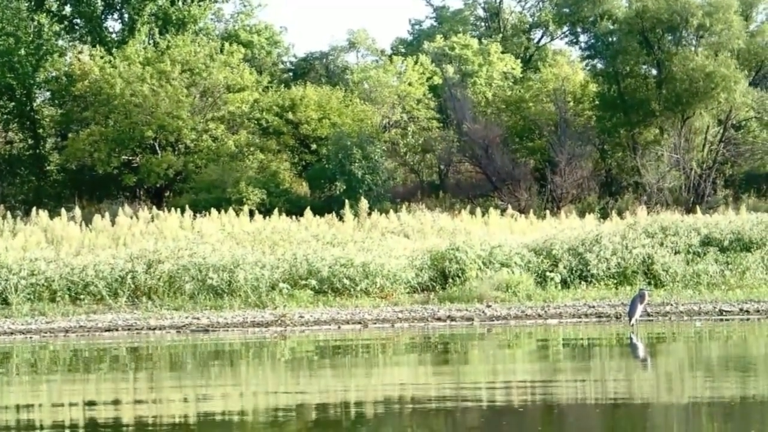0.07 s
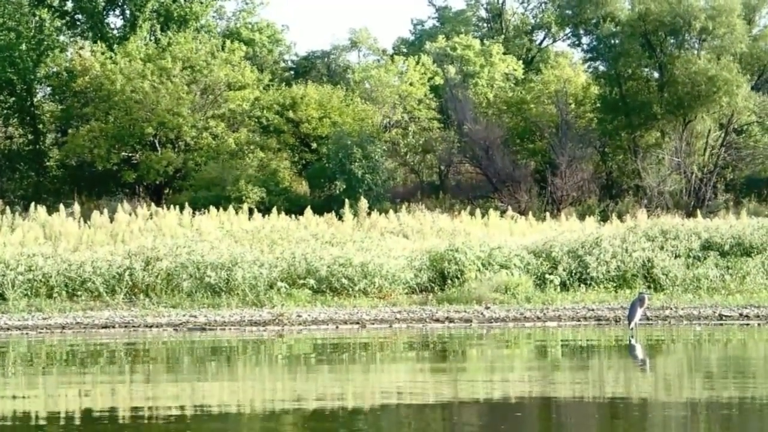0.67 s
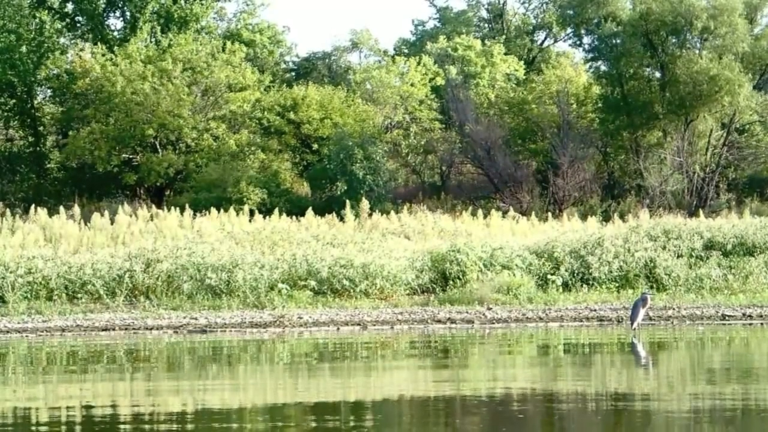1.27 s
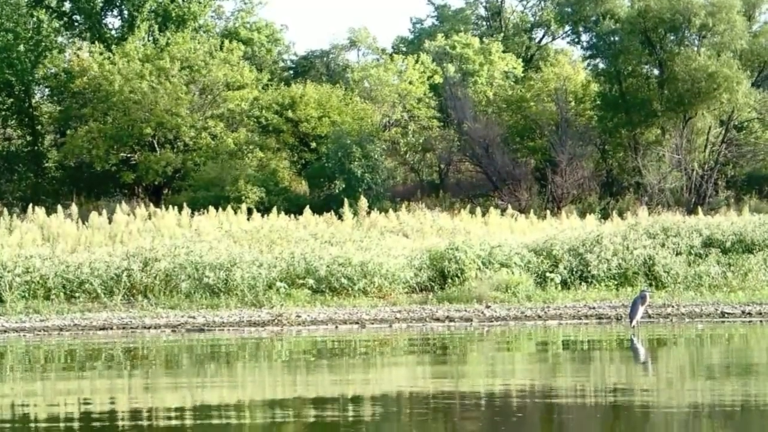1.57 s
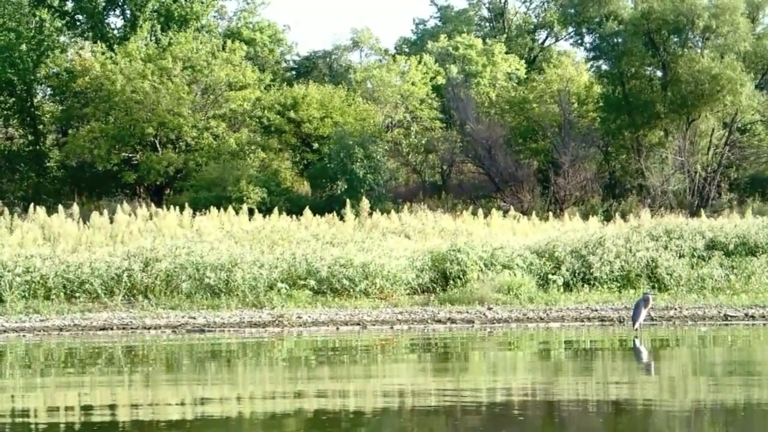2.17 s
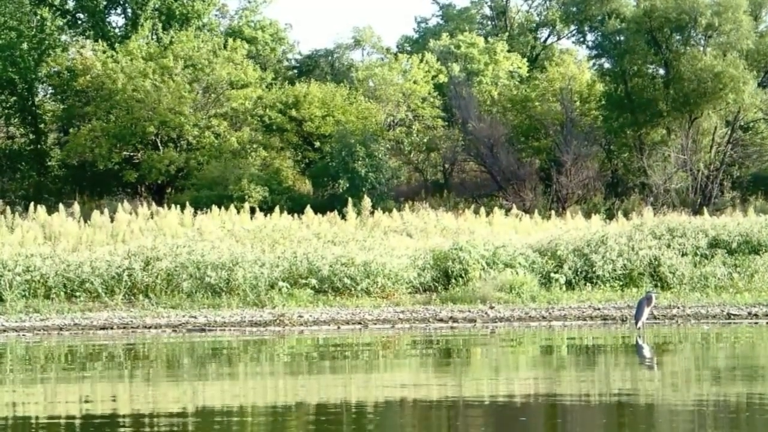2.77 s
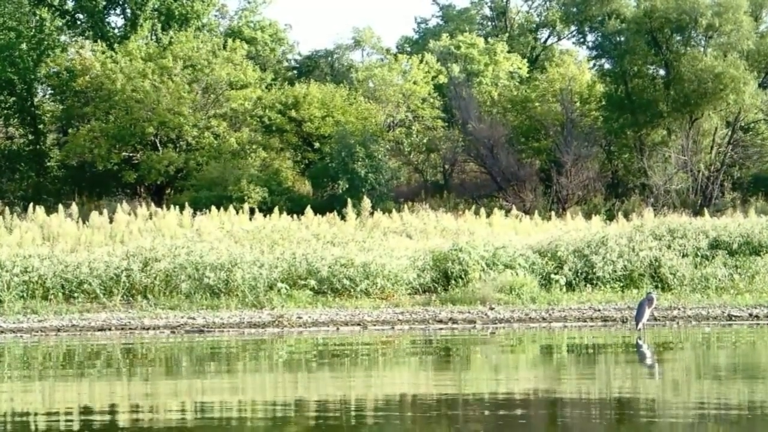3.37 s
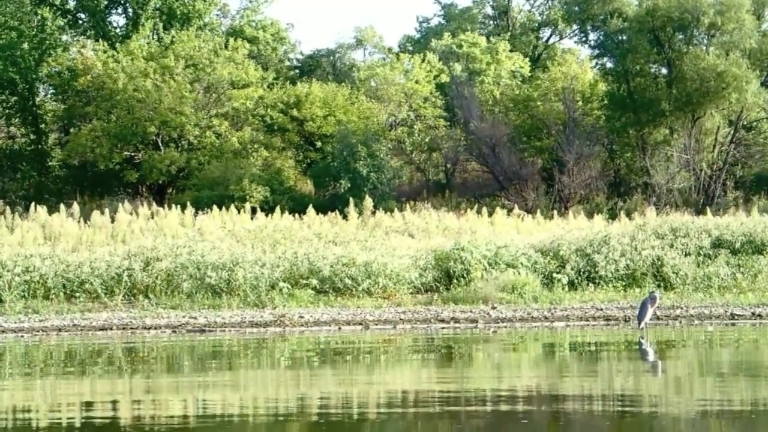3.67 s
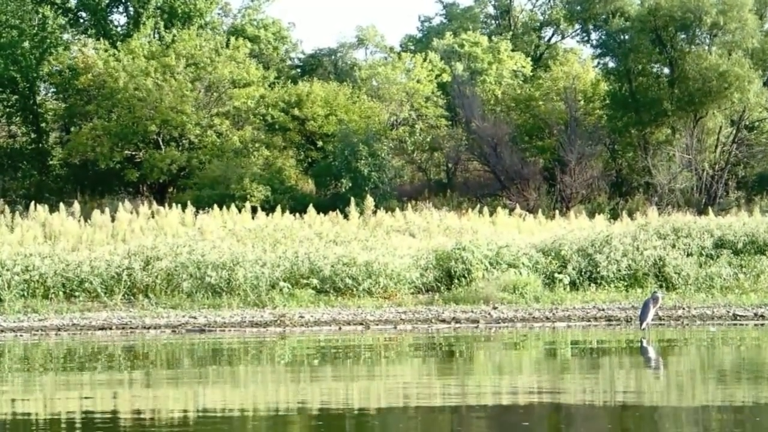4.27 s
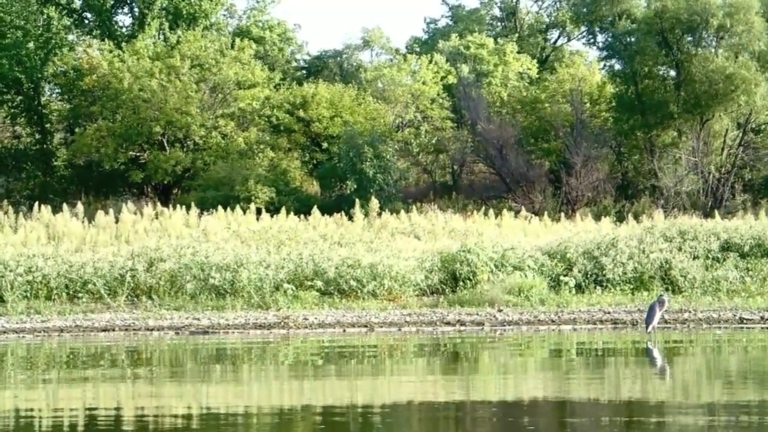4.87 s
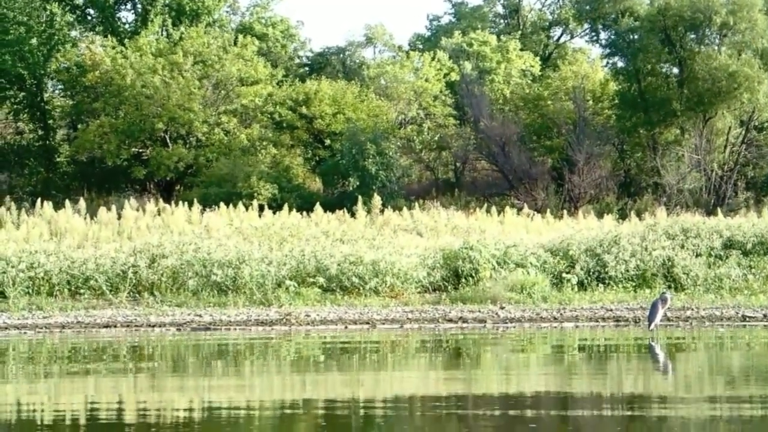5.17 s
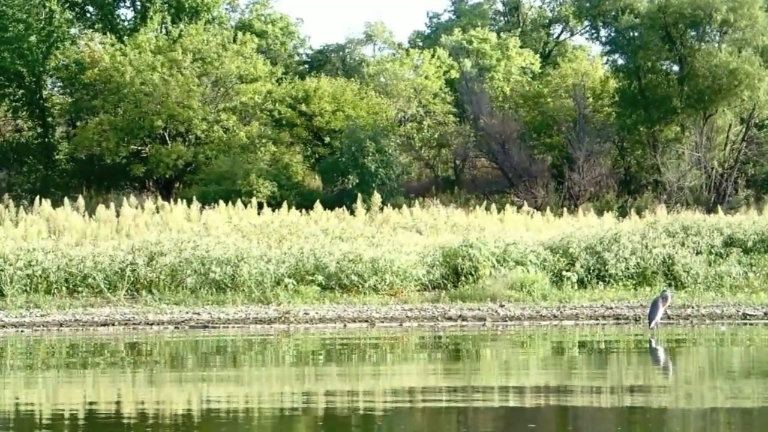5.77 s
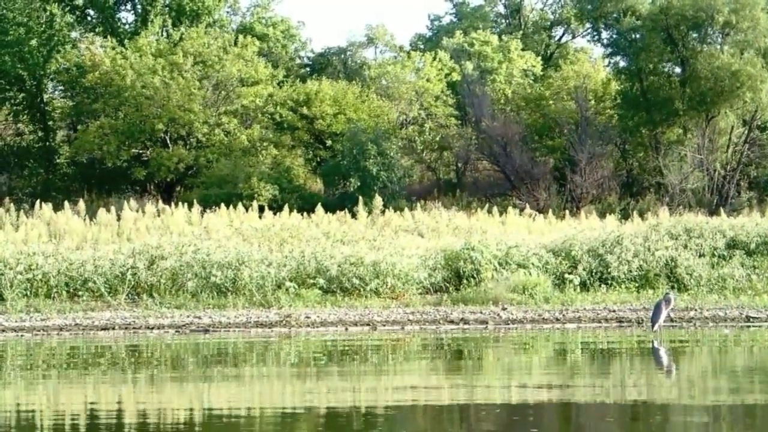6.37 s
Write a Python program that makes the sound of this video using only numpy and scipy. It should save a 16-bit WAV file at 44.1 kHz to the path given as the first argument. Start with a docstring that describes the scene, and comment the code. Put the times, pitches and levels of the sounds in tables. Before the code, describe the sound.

Two small birds trade thin, high whistles and peeps over a steady drone of crickets and katydids on a quiet lake shore.

```python
"""A still, wooded lake shore in late summer. Crickets and katydids drone in the weeds over a soft hush,
a distant hum and faint twittering. Just before 1 s a small bird on the right starts thin, falling
whistles; a second overlaps it with peeps and swoops, and the tree line gives a faint echo. After 3 s the
first drops out and a far bird peeps. Around 5 s the cricket chorus crests and one nearer cricket chirps
with its wings; the second bird sings on to the end."""
import sys
import numpy as np
from scipy import signal
from scipy.fft import rfft, irfft, next_fast_len
from scipy.io import wavfile
from scipy.ndimage import uniform_filter1d

SR = 44100
rng = np.random.default_rng(int(sys.argv[2]) if len(sys.argv) > 2 else 0)


def persist_wave(psi):
    """Save psi, clipped to +-1, as 16-bit WAV."""
    counts = np.round(np.clip(psi, -1, 1) * 32767).astype(np.int16)
    wavfile.write(sys.argv[1], SR, np.atleast_2d(counts).T)


N = 291937
TIME = np.arange(N) / SR
FIRST_BIRD_RIGHT_DB, SECOND_BIRD_RIGHT_DB, WEEDS_RIGHT_DB = 11, 8, 6.5  # pan: right level over left

# tone of the hush: (frequency [Hz], relative density [dB])
HUSH_SPECTRUM = [(25, -34), (45, -21), (70, -11.5), (110, -2.5), (200, 0.5), (320, -1.5), (700, -1.5),
                 (1600, -6.5), (2800, -7.5), (6300, -10), (10000, -10.5), (15500, -10)]
# stereo image of the hush: (frequency [Hz], left-right likeness [0-1])
HUSH_LIKENESS = [(120, 0.67), (330, 0.11), (2000, 0.01), (8000, 0.3)]
# partials of the distant hum: (pitch [Hz], start level [dB], end level [dB])
HUM_PARTIALS = [(86.2, -83.5, -68), (171.7, -65.5, -72.5)]
# swells of the katydids, about 1.2 s apart: (crest time [s], rise [dB])
KATYDID_CRESTS = [(1.62, 3.5), (2.85, 4), (4.1, 4.5), (5.35, 3), (6.35, 5.5)]
# fader curve of the cricket chorus: (time [s], level [dB])
CHORUS_FADER = [(0, -60), (1.5, -55.5), (3.4, -54), (5, -51), (6.62, -55.5)]
# pitches the crickets gather around: (centre [Hz], width [Hz], relative level [dB])
CHORUS_BANDS = [(4278, 236, -1.5), (4553, 250, -1.5), (5110, 410, -6.5)]
# the near cricket's runs of wing strokes: (start [s], end [s])
WING_RUNS = [(4.483, 4.782), (4.914, 5.047), (5.082, 5.114), (5.149, 5.282), (5.315, 5.348), (5.381, 5.414)]
# the far bird's peeps: (centre time [s], length [s], pitch [Hz], level [dB])
FAR_BIRD_PEEPS = [(3.48, 0.038, 3360, -58), (3.545, 0.064, 3362, -56.5), (3.62, 0.032, 3430, -54),
                  (3.866, .028, 3700, -55), (3.942, .03, 3290, -59), (4.065, 0.072, 3160, -59),
                  (4.16, 0.035, 3357, -55.5), (4.283, 0.041, 3670, -50.5), (4.333, .022, 3720, -58),
                  (4.386, 0.029, 3726, -53), (4.467, 0.045, 3438, -55.5), (4.82, 0.086, 3600, -52.5),
                  (4.873, 0.041, 3377, -52.5), (4.993, .035, 3640, -51), (5.265, 0.073, 3270, -56),
                  (6.305, .025, 3643, -60), (6.38, .025, 3834, -57), (6.6, .035, 3820, -56)]
# dry ticks and lisps: (centre time [s], length [s], pitch [Hz], level [dB])
TICKS_AND_LISPS = [(1.505, .018, 5650, -47), (4.398, .0011, 4350, -26), (4.61, .014, 5750, -49),
                   (5.452, .0005, 3300, -32)]
# arched peeps, some trailing off in a soft sagging note (None if not):
# (centre time [s], length [s], pitch [Hz], level [dB], sag pitch [Hz], sag level [dB])
NEAR_PEEPS = [(1.071, .037, 4520, -34, 3863, -57), (1.541, .031, 4390, -31, 3880, -58),
              (1.922, .035, 4550, -44.5, 3920, -53), (2.507, .035, 4198, -46, None, None),
              (2.559, .03, 4398, -34, None, None), (2.608, .03, 4333, -33.5, None, None),
              (3.112, .04, 4444, -37.5, None, None), (3.215, 0.027, 4196, -56, 3853, -51.5),
              (3.671, .031, 4190, -45.5, None, None), (3.712, .036, 4423, -47, 3895, -52),
              (3.742, 0.032, 4573, -44.5, None, None), (4.067, .04, 4553, -42, 3900, -50.5),
              (4.445, .035, 4474, -42.5, 3926, -53), (4.619, .038, 4318, -40.5, None, None),
              (4.712, .052, 4540, -39, None, None), (5.34, .042, 4427, -43.5, 3960, -50),
              (5.52, .022, 4200, -51, None, None), (5.614, .05, 4690, -42.5, None, None),
              (5.888, .03, 4582, -39.8, 3916, -57.5), (6.487, .055, 4560, -43.5, None, None)]
# the second bird's swooping whistles: (leap time [s], climb length [s], arch length [s], top pitch [Hz],
# climb level [dB], climb swell [dB], top level [dB], arch fade [dB])
SECOND_BIRD_SWOOPS = [(1.465, 0.12, 0.11, 4747, -41.5, 13, -39, 13),
                      (2.107, .16, .115, 4745, -37.5, 7, -37, 10),
                      (2.705, .02, 0.15, 4600, -63, 5, -37.5, 19),
                      (3.253, 0.12, 0.11, 4635, -47, -3, -41.5, 9),
                      (3.887, 0.12, .138, 4740, -45.5, 8, -49, -8),
                      (4.865, .12, 0.1, 4666, -40.5, 25, -36, 14),
                      (5.752, 0.12, .09, 4640, -51, 9, -41.5, 9.5),
                      (6.67, .15, .1, 4660, -47.5, 18, -40, 12)]
# the first bird's downward slurs: (start [s], length [s], opening pitch [Hz], level [dB])
FIRST_BIRD_SLURS = [(1.974, .045, 4345, -41), (2.426, 0.04, 4200, -42.5), (3.198, 0.062, 4100, -49)]
# the first bird's falling whistles: (turn time [s], hold length [s], fall length [s], opening pitch [Hz],
# turn pitch [Hz], waver depth [Hz], level [dB], swell while held [dB])
FIRST_BIRD_FALLS = [(.824, 0.093, 0.12, 4250, 4166, 50, -47, -3.5),
                    (1.307, 0.1, 0.12, 4370, 4440, 45.3, -33.5, 2.5),
                    (1.763, .1, 0.12, 4390, 4540, 25.08, -30.5, 1.5),
                    (2.202, .092, .124, 4320, 4540, 55, -28, 8),
                    (2.69, 0.073, 0.094, 4300, 3980, 110, -43, 2)]


def from_db(db):
    return 10 ** (np.asarray(db) / 20)


def unit_rms(x):
    return x / np.sqrt(np.mean(x ** 2) + 1e-20)


def automation(rows):
    """One per-sample curve for each column after the time column."""
    times, *columns = np.transpose(rows)
    return [np.interp(TIME, np.sort(times), column) for column in columns]


def at_hz(points, hz):
    frequencies, values = np.transpose(points)
    return np.interp(np.log(hz), np.log(frequencies), values)


def drift(rate_hz):
    """Smooth random modulation with an rms of 1."""
    hop, run_in = 40, 2000
    pole = np.exp(-2 * np.pi * hop * rate_hz / SR)
    noise = rng.standard_normal(N // hop + run_in + 2)
    slow = signal.lfilter([1], [1, -2 * pole, pole * pole], noise)[run_in:]
    return np.interp(np.arange(N) / hop, np.arange(len(slow)), unit_rms(slow))


def phase_of(hz):
    return 2 * np.pi * np.cumsum(hz) / SR


def bandpass(x, low, high, order=2):
    return signal.sosfilt(signal.butter(order, [low, min(high, .45 * SR)], "band", fs=SR, output="sos"), x)


def noise_band(low, high, likeness, order=2):
    """A band of stereo noise with a given left-right likeness and an rms of 1."""
    mid, side = bandpass(rng.standard_normal((2, N)), low, high, order)
    return unit_rms(np.sqrt(1 + likeness) * mid + np.sqrt(1 - likeness) * side * [[1], [-1]])


def pan(x, right_db, lag_s=0):
    """Place a sound by level difference and by how late it reaches the right side."""
    gains = from_db([[-right_db / 2], [right_db / 2]])
    size = next_fast_len(N)
    hz = np.arange(size // 2 + 1) * SR / size
    delay = np.exp(-2j * np.pi * hz * np.array([[0], [lag_s]]))
    return irfft(rfft(x, size) * delay, size)[:, :N] * gains / gains.mean()


def scatter(x, delay_s, decay_s):
    """Countless leaves and stems throw back a diffuse tail, different on each side."""
    t = np.arange(int((delay_s + decay_s) * SR)) / SR
    tail = rng.standard_normal((2, len(t))) * from_db(-60 * t / decay_s) * (t > delay_s)
    tail /= np.sqrt(np.sum(tail ** 2, axis=1, keepdims=True))
    return signal.fftconvolve(x[None], tail, axes=1)[:, :N]


def hush(level_db=-51.5, wander_db=.5):
    """A soft bed of outdoor air in half-octave bands, each breathing on its own."""
    edges = 20 * 2 ** np.arange(0, 10, .5)
    air = 0
    for low, high in zip(edges, edges[1:]):
        hz = np.sqrt(low * high)
        gain = np.sqrt(high - low) * from_db(at_hz(HUSH_SPECTRUM, hz) + wander_db * drift(6.1))
        air += gain * noise_band(low, high, at_hz(HUSH_LIKENESS, hz), order=3)
    return from_db(level_db) * unit_rms(air)


def distant_hum():
    """Two low, wavering partials: the lower fades up as the upper recedes."""
    hum = 0
    for hz, start_db, end_db in HUM_PARTIALS:
        phase = phase_of(hz * (1 + .0153 * drift(4.56)))
        hum += from_db(np.linspace(start_db, end_db, N) + 2 * drift(2.9)) * np.sin(phase)
    return hum


def katydids(floor_db=-57, swell_half_width_s=.4, fast_stroke_hz=49, slow_stroke_hz=19):
    """A high rasp that comes in swells, pulsed by wing strokes at two rates."""
    swells_db = sum(db * np.exp(-((TIME - s) / swell_half_width_s) ** 2) for s, db in KATYDID_CRESTS)
    wide_rasp = noise_band(11050, 12750, likeness=.5, order=1)
    rasp = unit_rms(bandpass(wide_rasp, 9460, 13460))
    fast = np.sin(phase_of(fast_stroke_hz + 2.55 * drift(4.4)))
    slow = np.sin(phase_of(slow_stroke_hz + 1.7 * drift(4.5)))
    return pan(from_db(floor_db + swells_db) * rasp * (1 + .2 * fast + .11 * slow), right_db=3.5)


def cricket_chorus(shimmer_db=2.4):
    """Many far crickets blur into a few shimmering bands."""
    level_db, = automation(CHORUS_FADER)
    chorus = 0
    for hz, width, db in CHORUS_BANDS:
        shimmer = from_db(db + shimmer_db * drift(9.1))
        chorus += shimmer * noise_band(hz - width / 2, hz + width / 2, likeness=.92)
    return pan(from_db(level_db) * chorus, WEEDS_RIGHT_DB, lag_s=4.5e-5)


def near_cricket(pitch_hz=4868, level_db=-50, stroke_s=1 / 30):
    """Each closing of the wings rings one pure pulse that sags slightly in pitch."""
    stroke = sum(((TIME - start) / stroke_s % 1) * (TIME >= start) * (TIME < end)
                 for start, end in WING_RUNS)
    pulse = np.clip(2 * np.sin(np.pi * stroke) ** 2, 0, 1)
    ring = np.sqrt(2) * np.sin(phase_of(pitch_hz * (1 - .005 * (stroke - .5))))
    return pan(from_db(level_db) * pulse * ring, right_db=2, lag_s=-4e-5)


def syrinx(pitch_hz, loudness, undertone_db=-44, undertone_growth=.49, quaver=.00216, flutter_db=1.5):
    """A bird's throat favours the second harmonic; the faint fundamental grows more slowly with effort."""
    phase = phase_of(pitch_hz * (1 + quaver * drift(72.3)))
    fundamental = from_db(undertone_db) * abs(loudness) ** undertone_growth * np.sin(phase / 2)
    flutter = from_db(flutter_db * drift(57))
    return np.sqrt(2) * flutter * (loudness * np.sin(phase) + fundamental)


def peeps(rows, arch, taper, attack=1.0):
    """Short puffs of pressure bend the pitch as they swell; where two notes meet, the louder leads."""
    pitch_hz = np.full(N, np.mean(np.array(rows)[:, 2]))
    loudness = np.zeros(N)
    for centre_s, length_s, hz, level_db in rows:
        on = abs(TIME - centre_s) < .8 * length_s
        position = 2 * (TIME[on] - centre_s) / length_s
        bend = 2 * (np.sqrt(1 + 2 * (position + .153) ** 2) - 1)  # turns just before mid-note
        steepness = np.where(position < 0, attack, 1)
        pressure = from_db(level_db) * np.exp(-taper * (position ** 4) ** steepness)
        pitch_hz[on] = np.where(pressure > loudness[on], hz * (1 - arch * bend), pitch_hz[on])
        loudness[on] = np.maximum(pressure, loudness[on])
    return syrinx(pitch_hz, loudness)


def twitter(pitch_hz=3400, level_db=-65, loudest_s=4.7, fade_db_per_s=.5, count=80):
    """Birds deep in the weeds peep at loose intervals; their chatter swells and eases again."""
    jitter, size, tune, force = rng.uniform(-1, 1, (count, 4)).T
    times = (np.arange(count) + .5 + .25 * jitter) * TIME[-1] / count
    levels = level_db - fade_db_per_s * abs(times - loudest_s) + 2 * force
    rows = np.c_[times, .028 * 1.6 ** size, pitch_hz * (1 + .1 * tune), levels]
    return peeps(rows, arch=.03, taper=.42)


def ticks():
    """Tiny tone bursts: the shortest land as dry taps, the longer ones waver into thin lisps."""
    bursts = np.zeros(N)
    for centre_s, length_s, hz, level_db in TICKS_AND_LISPS:
        envelope = np.exp(-(2 * (TIME - centre_s) / length_s) ** 2)
        bursts += from_db(level_db) * envelope * np.sin(phase_of(hz * (1 + .04 * drift(200))))
    return bursts


def sagging_notes(after_s=.066, length_s=.087):
    """Soft, lower notes that trail some of the peeps and droop in the middle."""
    rows = [(s + after_s, length_s, sag_hz, sag_db) for s, *_, sag_hz, sag_db in NEAR_PEEPS if sag_hz]
    return peeps(rows, arch=-.017, taper=.56)


def whistles(phrases, glide_s=.0036, wobble=.005):
    """One bird glides, never quite steady, through phrases of (time [s], pitch [Hz], level [dB])."""
    pitch_hz, level_db = automation(np.vstack(sorted(phrases, key=lambda phrase: phrase[0][0])))
    sounding = sum((TIME >= phrase[0][0]) & (TIME <= phrase[-1][0]) for phrase in phrases)
    glide = int(glide_s * SR)
    pitch_hz = uniform_filter1d(pitch_hz, glide) * (1 + wobble * drift(25.4))
    return syrinx(pitch_hz, uniform_filter1d(from_db(level_db) * sounding, glide))


def swoop(leap_s, climb_s, arch_s, top_hz, climb_db, swell_db, top_db, fade_db):
    """Whistle shape: a dip, a slow climb, a leap to the top note, then an ever steeper arch down."""
    dip_hz, rise_hz, drop_hz = 4140, 270, 685
    t = np.arange(-climb_s, arch_s, 1 / SR)
    early, late = np.clip(-t / climb_s, 0, 1), np.clip(t / arch_s, 0, 1)
    leapt = .5 + .5 * np.tanh(t / .00787)  # quick crossfade from climb to arch
    sunk = .3 * late + .7 * late ** 4  # an even tilt, then a late plunge
    settle_hz = 200 * np.exp(-(t + climb_s) / .01)  # sinks into the dip
    climb_hz = dip_hz + settle_hz + rise_hz * (1 - early) ** 1.5
    pitch_hz = (1 - leapt) * climb_hz + leapt * (top_hz - drop_hz * sunk)
    level_db = (1 - leapt) * (climb_db - swell_db * early ** 2) + leapt * (top_db - fade_db * sunk)
    return np.c_[leap_s + t, pitch_hz, level_db]


def slur(start_s, length_s, opening_hz, level_db, slide_hz_per_s=10500, fade_db_per_s=170):
    """Whistle shape: a quick, straight slide down that fades."""
    t = np.arange(0, length_s, 1 / SR)
    return np.c_[start_s + t, opening_hz - slide_hz_per_s * t, level_db - fade_db_per_s * t]


def fall(turn_s, hold_s, fall_s, opening_hz, turn_hz, waver_hz, level_db, swell_db):
    """Whistle shape: scoops in from below, wavers, turns at its last crest and softens as it sinks."""
    scoop_hz, scoop_db, scoop_s = 380, 26, .0065
    waver_rate_hz, crest_db_per_hz = 23.9, .03  # louder on the crests
    end_hz, end_db = 3466, -48
    t = np.arange(-hold_s, fall_s, 1 / SR)
    early, late = np.clip(-t / hold_s, 0, 1), np.clip(t / fall_s, 0, 1)
    scoop = np.exp(-(t + hold_s) / scoop_s)
    waver = waver_hz * (np.cos(2 * np.pi * waver_rate_hz * t) - 1) * (t < 0)
    held_hz = turn_hz + (opening_hz - turn_hz) * early - scoop_hz * scoop + waver
    held_db = level_db + crest_db_per_hz * waver - swell_db * early - scoop_db * scoop
    drop_hz = (end_hz - turn_hz) * late ** 1.2
    fade_db = (end_db - level_db) * (1 - np.exp(-(late / .45) ** 2))
    return np.c_[turn_s + t, held_hz + drop_hz, held_db + fade_db]


def birds():
    """Near and far birds, with quick reflections from the bank and a long faint echo from the trees."""
    first = whistles([fall(*row) for row in FIRST_BIRD_FALLS] + [slur(*row) for row in FIRST_BIRD_SLURS])
    second = whistles([swoop(*row) for row in SECOND_BIRD_SWOOPS])
    calls = peeps([row[:4] for row in NEAR_PEEPS], arch=.047, taper=1.3, attack=1.7) + ticks()
    sags = sagging_notes()
    far = peeps(FAR_BIRD_PEEPS, arch=.04, taper=1.3) + twitter()
    direct = pan(first + sags + far, FIRST_BIRD_RIGHT_DB, lag_s=2e-5)
    direct += pan(second + calls, SECOND_BIRD_RIGHT_DB, lag_s=3e-5)
    near = first + second + calls + sags
    bank = from_db(-17) * scatter(near, delay_s=.003, decay_s=.1)
    trees = from_db(-13) * scatter(near, delay_s=.06, decay_s=1.5)
    distance_blur = from_db(-7) * scatter(far, delay_s=0, decay_s=.5)
    return direct + pan(bank + trees + distance_blur, WEEDS_RIGHT_DB)


def scene():
    """Birds up front, insects behind them, hush and hum underneath."""
    return birds() + near_cricket() + cricket_chorus() + katydids() + pan(hush() + distant_hum(), right_db=5)


def record(dry, cutoff_hz=15800):
    """A steep high cut on the whole mix."""
    return signal.sosfilt(signal.ellip(10, .1, 70, cutoff_hz, fs=SR, output="sos"), dry)


dry = scene()
out = record(dry)
persist_wave(out)
```